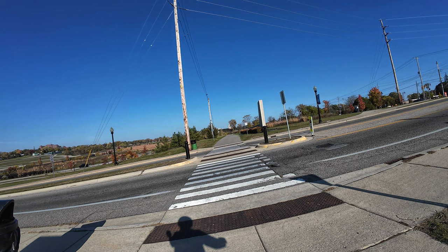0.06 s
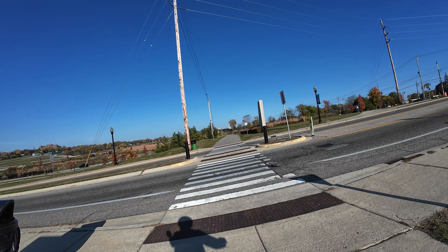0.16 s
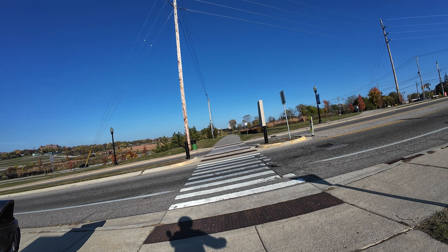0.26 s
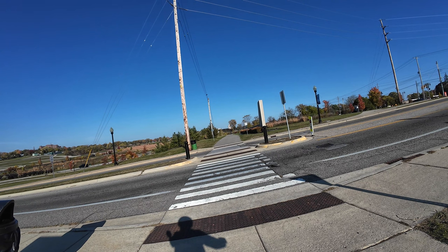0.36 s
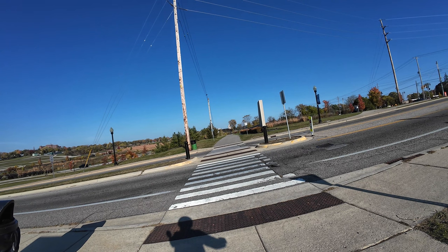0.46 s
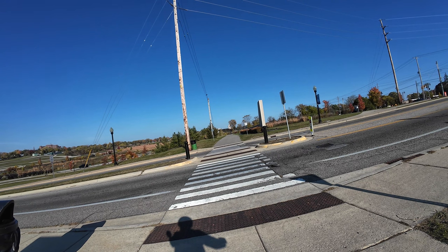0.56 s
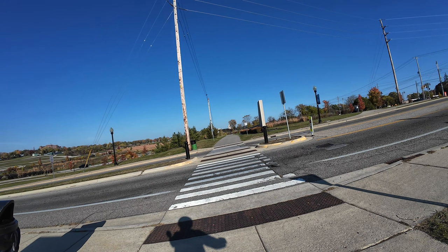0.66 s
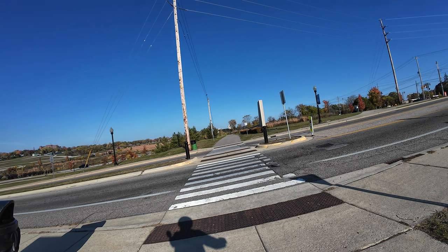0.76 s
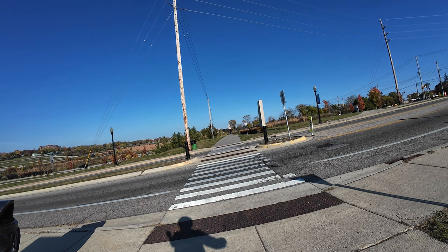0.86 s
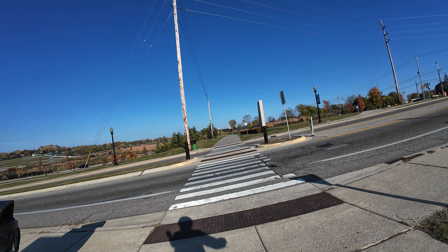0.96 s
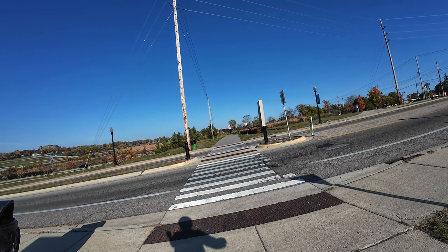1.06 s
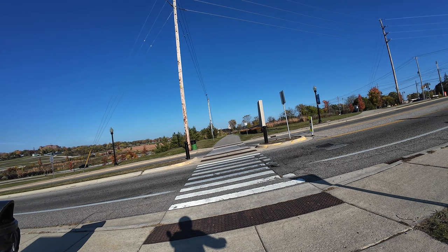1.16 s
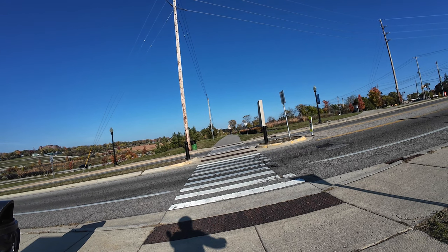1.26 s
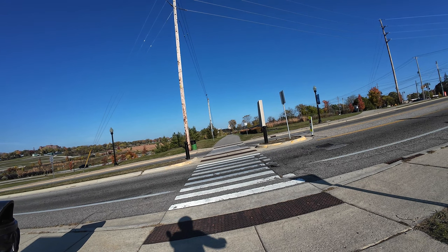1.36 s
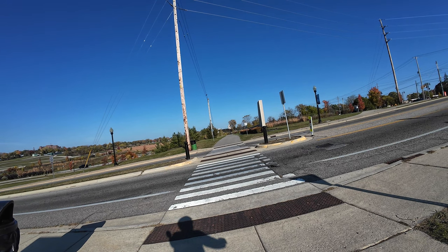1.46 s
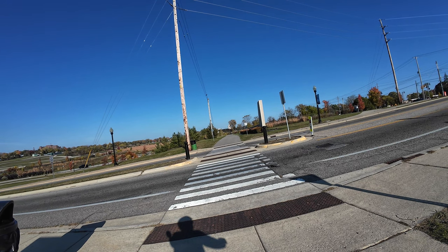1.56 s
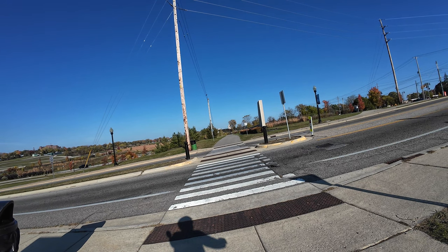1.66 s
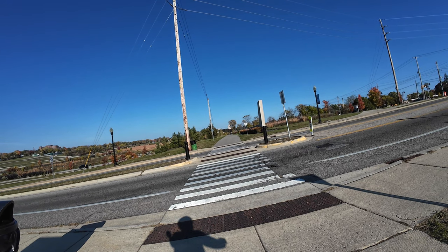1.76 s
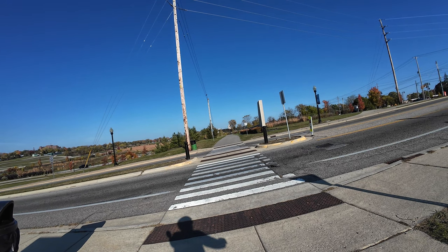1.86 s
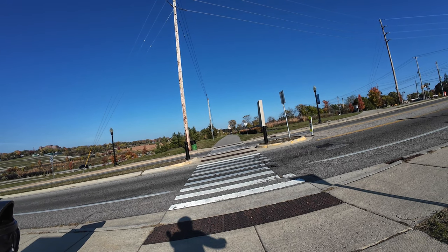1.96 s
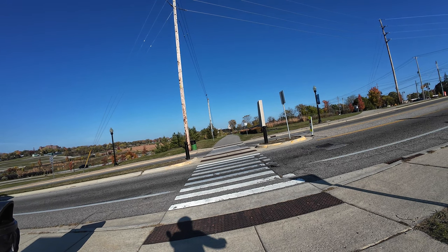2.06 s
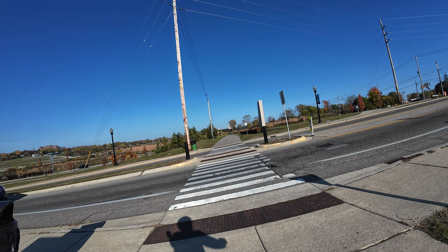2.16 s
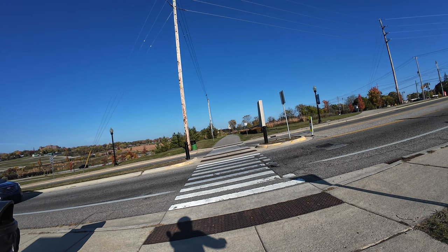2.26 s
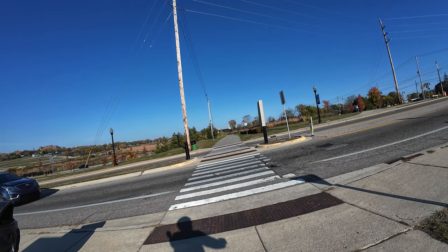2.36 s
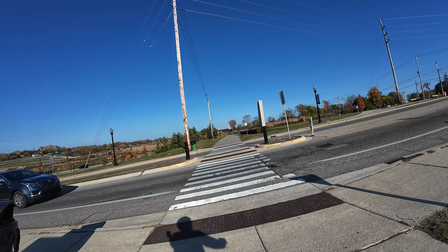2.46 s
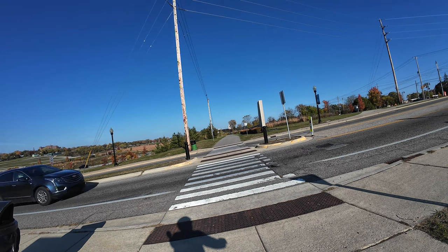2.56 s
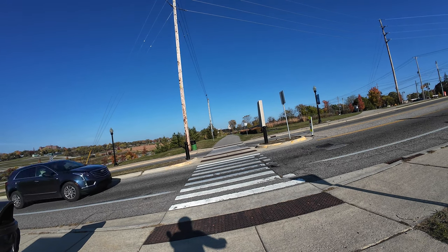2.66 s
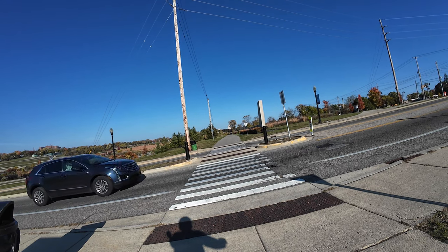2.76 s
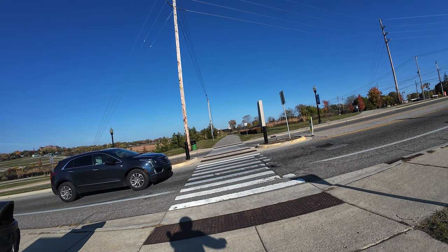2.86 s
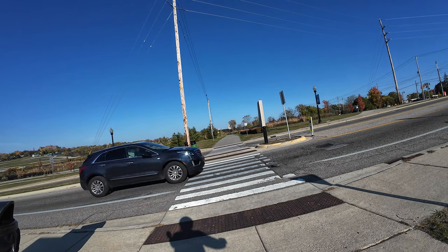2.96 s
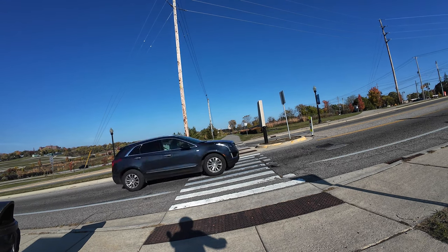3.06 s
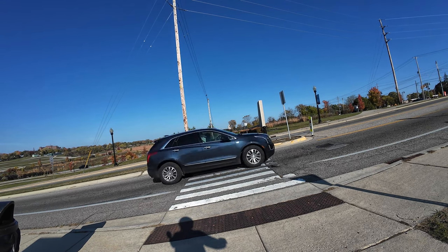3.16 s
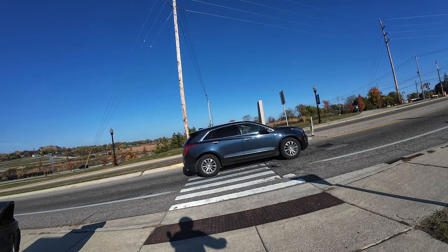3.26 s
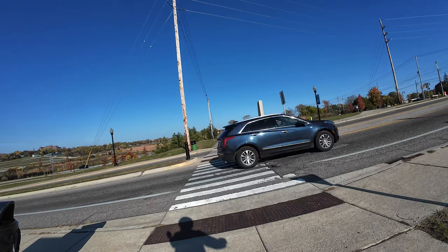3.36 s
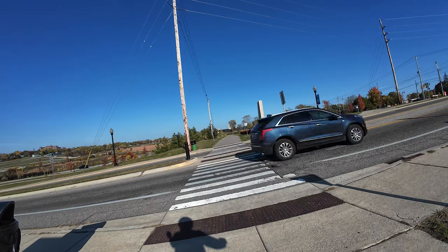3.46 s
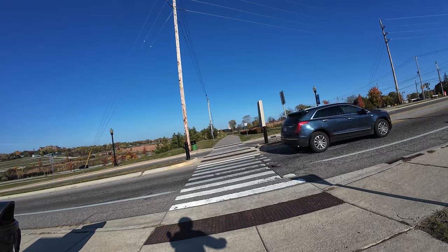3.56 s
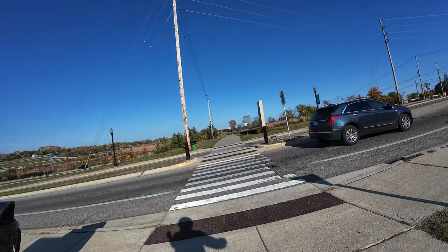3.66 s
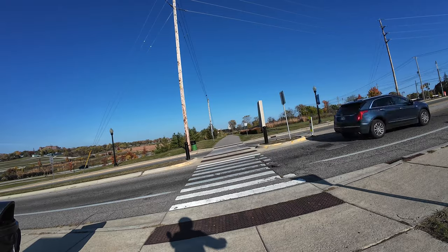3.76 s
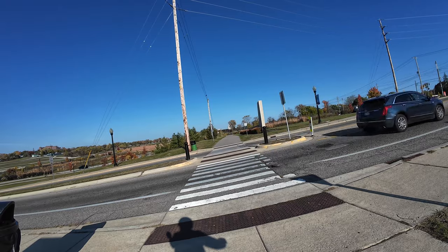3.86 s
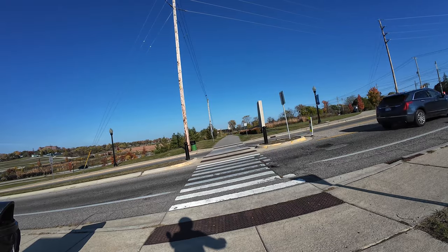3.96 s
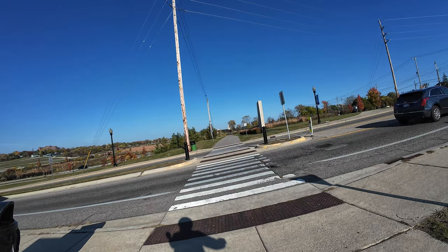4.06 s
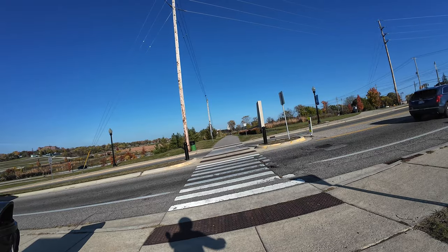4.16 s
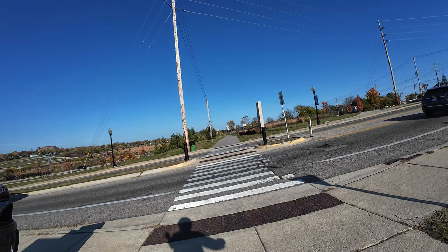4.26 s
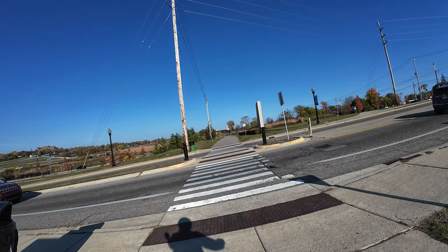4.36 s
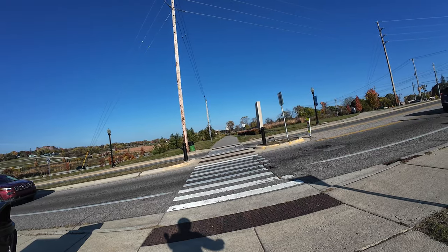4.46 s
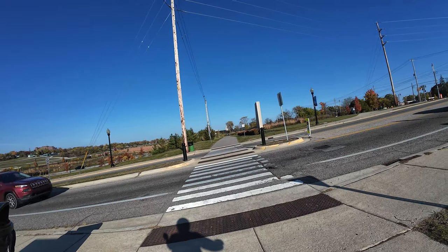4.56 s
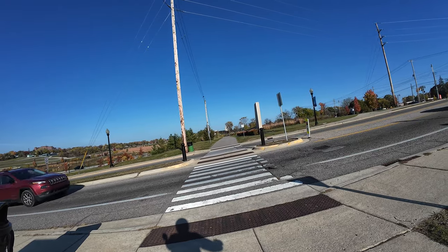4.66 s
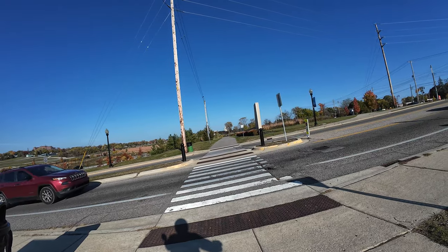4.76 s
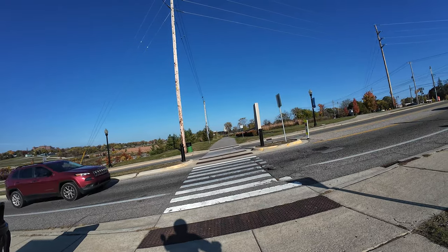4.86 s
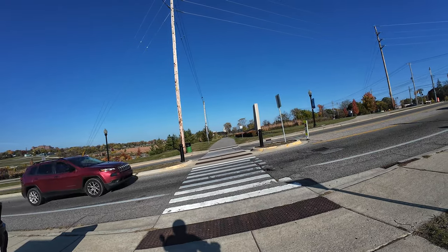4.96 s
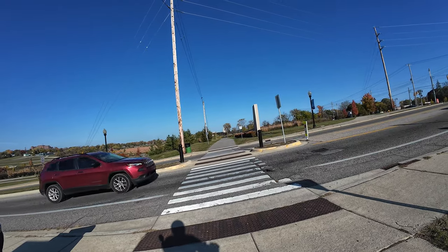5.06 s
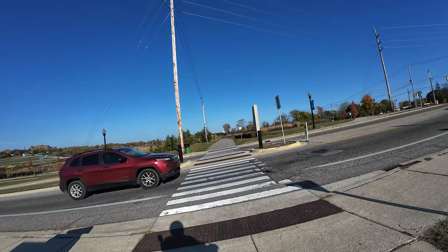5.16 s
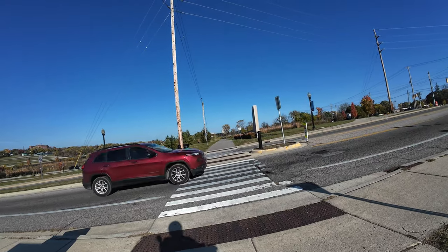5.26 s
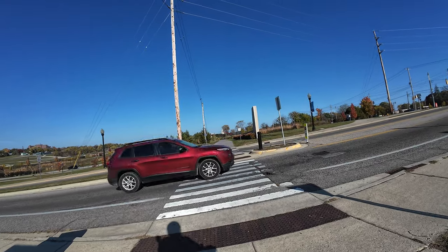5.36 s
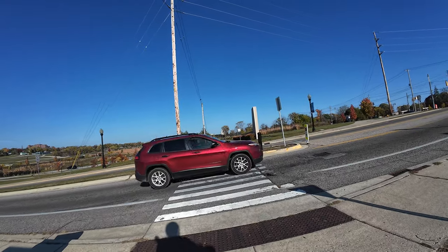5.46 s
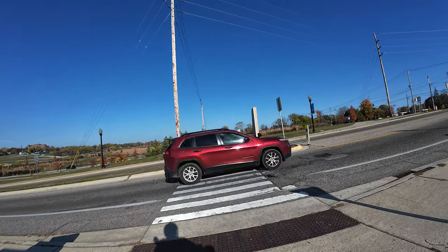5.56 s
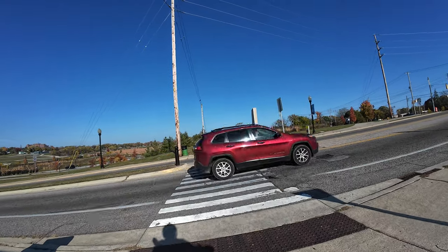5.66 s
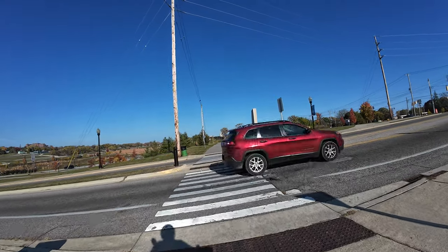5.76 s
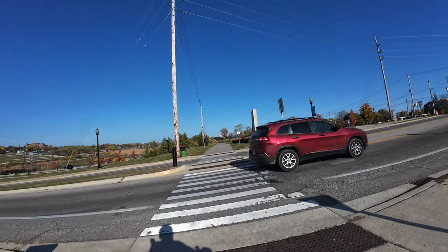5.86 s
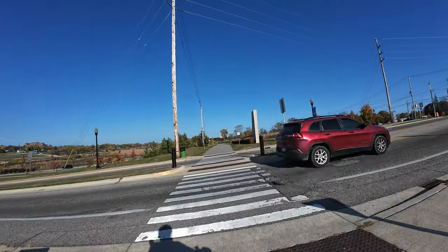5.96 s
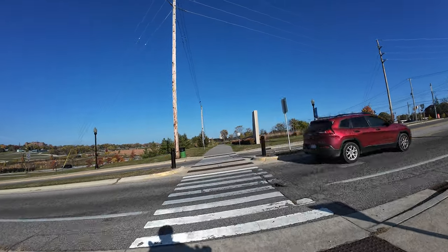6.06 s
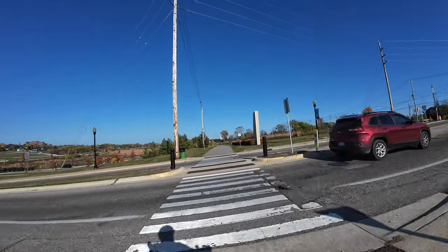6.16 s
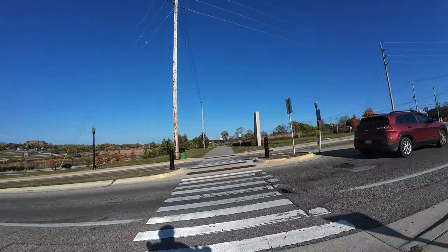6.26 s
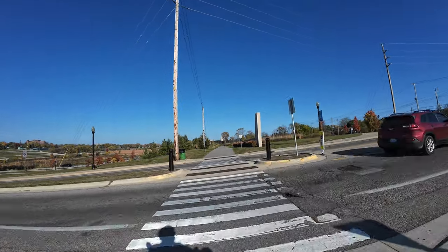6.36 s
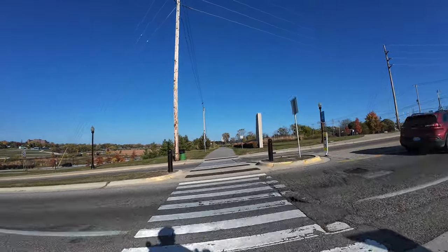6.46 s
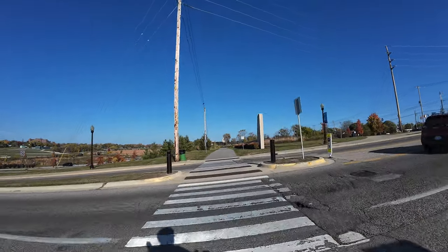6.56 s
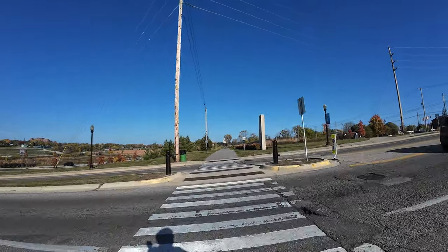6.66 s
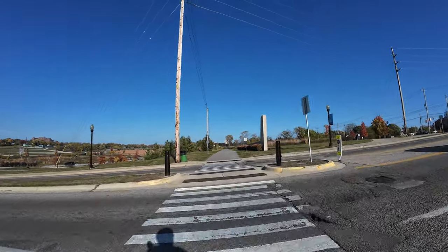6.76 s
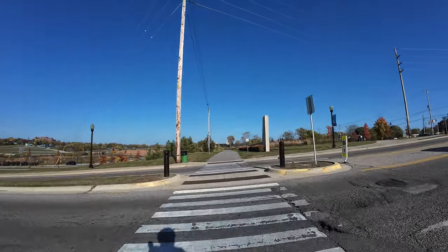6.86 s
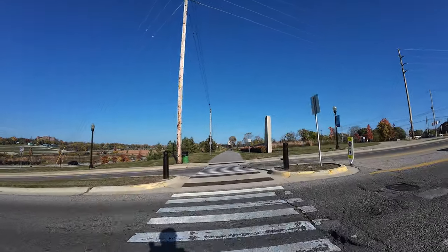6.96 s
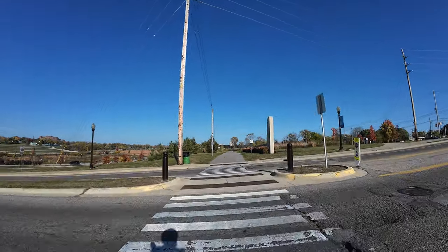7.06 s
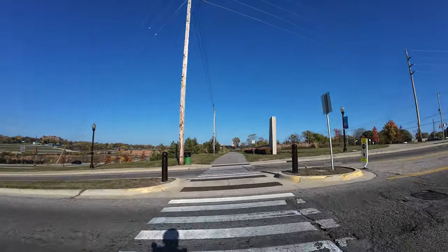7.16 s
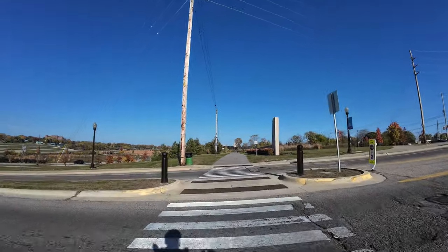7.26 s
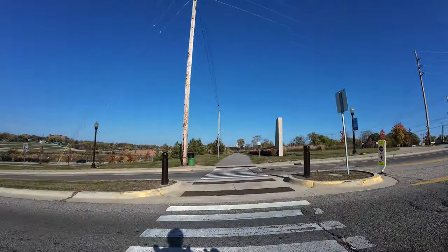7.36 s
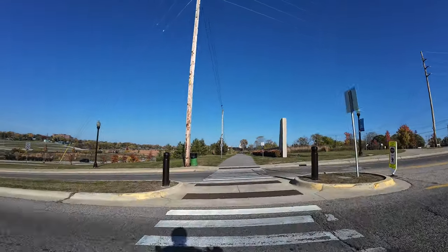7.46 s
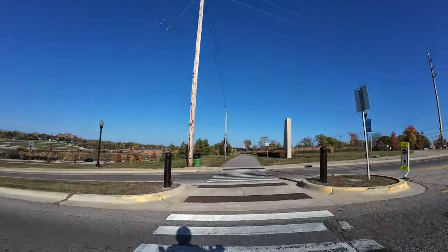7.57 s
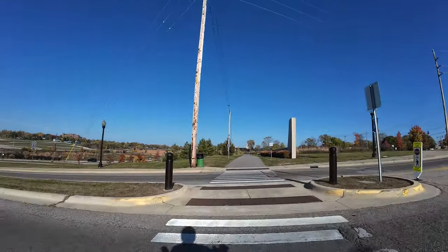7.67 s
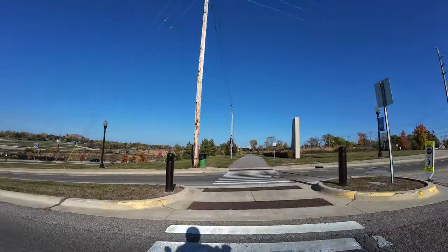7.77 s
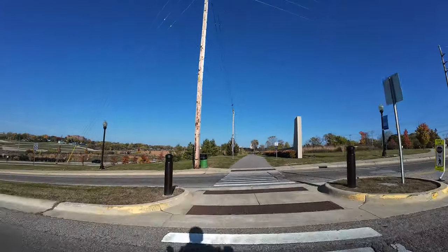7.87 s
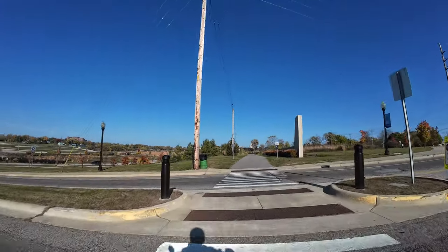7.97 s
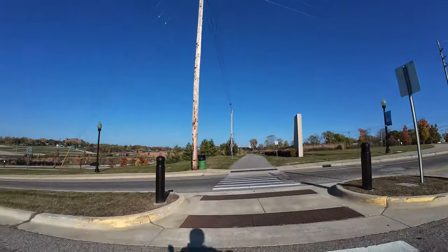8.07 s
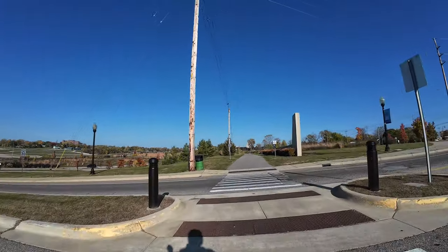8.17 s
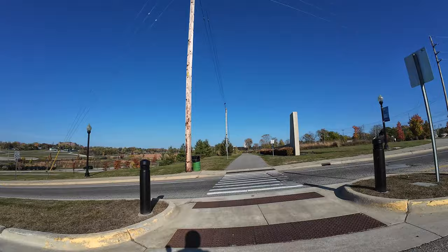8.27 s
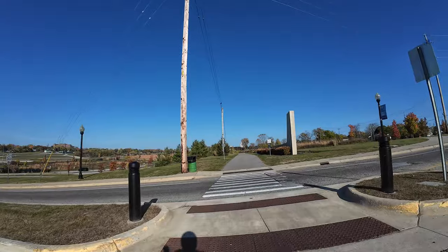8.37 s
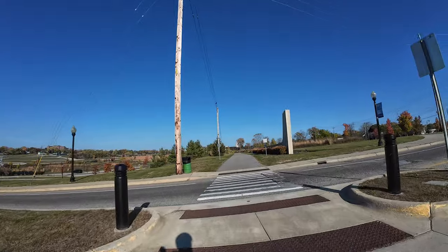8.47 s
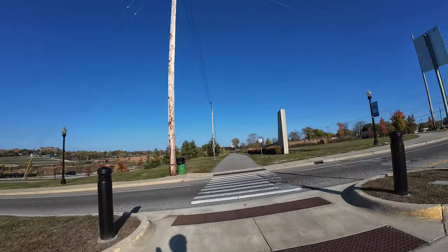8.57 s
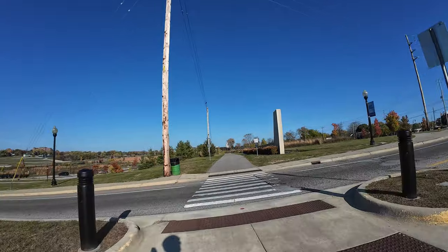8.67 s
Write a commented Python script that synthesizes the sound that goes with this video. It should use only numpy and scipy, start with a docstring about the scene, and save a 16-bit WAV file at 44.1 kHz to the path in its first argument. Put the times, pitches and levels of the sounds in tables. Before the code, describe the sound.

Two cars sweep past left to right with tyre roar and wheel thuds, gusts rumbling on the microphone, then a bike rolls off with throbs and clicks.

```python
"""Cars on a road beside a path, on two close microphone ports: one passes as it begins, two follow left to right,
one nears from the right. Banded noise makes tyres and bodies; sines the engines; decaying rings the wheel thuds.
The bike that carries the microphone rolls off: its frame throbs, its drive whines (sines) and clicks (noise).
Gusts rumble on the ports as low noise, and an insect trills in the verge with short pips of sine and noise."""
import sys
import numpy as np
from scipy import signal
from scipy.io import wavfile
from scipy.ndimage import uniform_filter1d, map_coordinates

SR = 44100
rng = np.random.default_rng(int(sys.argv[2]) if len(sys.argv) > 2 else 0)


def to_wav(s):
    """Save 16-bit WAV."""
    ch = np.atleast_2d(s).T  # columns
    pcm = np.round(np.clip(ch, -1, 1) * 32767)  # PCM
    wavfile.write(sys.argv[1], SR, pcm.astype(np.int16))


N = 384111


def amp(db):
    """Gain of a level in dB."""
    return 10 ** (np.asarray(db) / 20)


def rms_one(x):
    """Scaled to rms 1."""
    return x / np.sqrt(np.mean(x ** 2) + 1e-20)


def in_time(rows):
    """Columns of a table, sample by sample; its first column is time in seconds."""
    s, *columns = np.transpose(rows)
    return [np.interp(np.arange(N) / SR, s, c) for c in columns]


def every_sample(coarse):
    """A control kept at every 256th sample, filled in."""
    return np.interp(np.arange(N) / 256, np.arange(len(coarse)), coarse)


def sounding(rows, fade_s=0.013):
    """1 while a table lasts, fading at both ends."""
    t = np.arange(N) / SR
    inside = np.minimum(t - rows[0][0], rows[-1][0] - t)
    return np.clip(inside / fade_s + 1, 0, 1)


def at_hz(points, hz, outside=None):
    """A spectrum read on a log-frequency axis."""
    point_hz, value = np.transpose(points)
    return np.interp(np.log(hz), np.log(point_hz + 1e-9), value, outside, outside)


def drift(rate_hz):
    """Slow chance: coarse noise through a double one-pole low-pass, spread 1."""
    r = np.exp(-80 * np.pi * rate_hz / SR)      # one value per 40 samples
    noise = rng.standard_normal(N // 40 + 2002)
    slow = signal.lfilter([1], [1, -2 * r, r * r], noise)[2000:]      # settled part only
    return np.interp(np.arange(N) / 40, np.arange(len(slow)), rms_one(slow))


def band(x, low_hz, high_hz, order=2):
    """Butterworth band-pass."""
    edges = [low_hz, min(high_hz, .45 * SR)]
    return signal.sosfilt(signal.butter(order, edges, "band", fs=SR, output="sos"), x)


def tone(hz, db):
    """A sine of moving pitch and rms level."""
    cycles = np.cumsum(hz) / SR + rng.random()
    return np.sqrt(2) * amp(db) * np.sin(2 * np.pi * cycles)


def swells(times, levels_db, lengths):
    """Bell-shaped swells of power, summed; each length is the half length to 1/e."""
    t = np.arange(0, N, 64) / SR
    power = sum(amp(2 * db) * np.exp(-((t - s) / length) ** 2) for s, db, length in zip(times, levels_db, lengths))
    return np.interp(np.arange(N) / SR, t, power)


ROLL_START_S, ROLL_FULL_S = 5.3, 6.5


def rolling(t):
    """Speed of the bike, 0-1, gathered evenly."""
    return np.clip((t - ROLL_START_S) / (ROLL_FULL_S - ROLL_START_S), 0, 1)


# Spectra of body boom, tyre hiss and grit spray. Each row: frequency in Hz, relative level in dB per Hz.
BOOM, HISS, SPRAY = [(70, -18), (95, -3.5), (125, -3), (170, -3), (250, -2), (350, -3), (500, -4.5),
                     (700, -13.5), (1000, -31)], [(1500, -25), (2300, -4.5), (3300, -3), (4500, -4.5), (6200, -8.5),
                                   (7000, -17), (8500, -11.5)], [(6000, -25), (7200, -5), (8200, -2.5), (10000, -3),
                                                 (11800, -6), (13200, -3), (14500, -3.5), (16000, -20)]
# Spectra of tyre roar and tread song. Each row: multiple of the centre, relative level in dB per Hz.
ROAR, SONG = [(.4, -18.5), (.6, -10.5), (.8, -5), (.9, -1), (1, -0.5), (1.1, -1), (1.25, -6), (1.5, -8.5),
              (2.1, -31)], [(.6, -28), (.8, -6), (1, 2.5), (1.2, -3), (1.5, -11), (2.1, -24)]
# Colour of the traffic as the cars come and go. Each row: time in seconds, roar centre in Hz, song centre in Hz,
# boom slope and hiss slope in dB per octave.
COLOUR = [(0.0, 860, 1420, 1.5, -17), (0.19, 800, 1400, 1.5, -18), (0.27, 990, 1450, -1.5, -19),
          (0.5, 900, 1450, -.8, -21), (1.15, 830, 1450, -1.2, -18.5), (1.67, 810, 1470, -1.5, -12.5),
          (2.3, 810, 1410, -1.6, -16.5), (2.8, 800, 1500, -1.2, -13.5), (3.5, 727, 1500, -1.3, -9),
          (3.95, 813, 1440, -0.94, -10), (4.6, 880, 1490, -.2, -13), (5.12, 940, 1530, -0.5, -13),
          (5.7, 840, 1470, -2.1, -10), (6.62, 880, 1394, -.8, -7.5), (7.05, 720, 1400, -1.4, -7.5),
          (7.4, 765, 1400, -2.9, -8.5), (8.01, 870, 1380, -3, -10.5), (8.71, 830, 1470, -2.2, -8)]
BOOM_PIVOT_HZ, HISS_PIVOT_HZ = 220, 3300
# Notch cut in the boom by the echo off the ground. Each row: time in seconds, centre in Hz, depth in dB.
GROUND_NOTCH = [(0, 363, 10), (1.2, 346, 8.5), (2, 298, 4), (2.8, 277, 2), (3.5, 298, 5.5), (4.2, 321, 8),
                (5, 406, 2.5), (6, 450, -1), (7, 370, 6.5), (7.8, 395, 5), (8.71, 410, 7.5)]
NOTCH_OCTAVES = 0.33      # half width to 1/e of the depth
# Likeness of the ports before scattering. Each row: frequency in Hz, left-right likeness (0-1).
LIKENESS = [(60, 1), (250, .9998), (450, .999), (800, 0.99), (1500, 0.97), (3000, 0.97), (5000, 0.72),
            (9000, 0.75), (14000, 0.77)]
# Balance of the ports. Each row: frequency in Hz, left minus right in dB.
TILT = [(250, 0), (700, .5), (1500, .7), (3000, 1), (5500, 1.5), (10000, -1.2), (14000, -.5)]


def traffic(patchy_db=1.0, shared_db=-0.66):
    """Five noise sources add their power in narrow bands, each band with its own flicker and likeness."""
    edges = 80 * 2 ** (np.arange(39) / 5)      # fifths of an octave
    hz = np.sqrt(edges[1:] * edges[:-1])[:, None]
    roar_hz, song_hz, boom_slope, hiss_slope = np.array(in_time(COLOUR))[:, ::256]
    notch_hz, notch_db = np.array(in_time(GROUND_NOTCH))[:, ::256]
    notch = -notch_db * np.exp(-(np.log2(hz / notch_hz) / NOTCH_OCTAVES) ** 2)
    layers, _, scattered_db = passes()
    scattered = amp(every_sample(scattered_db))
    boom = at_hz(BOOM, hz, -99) + boom_slope * np.log2(hz / BOOM_PIVOT_HZ) + notch
    roar = at_hz(ROAR, hz / roar_hz, -99)
    song = at_hz(SONG, hz / song_hz, -99)
    hiss = at_hz(HISS, hz, -99) + hiss_slope * np.log2(hz / HISS_PIVOT_HZ)
    spray = at_hz(SPRAY, hz, -99)
    power = 0
    for shape, layer in zip((boom, roar, song, hiss, spray), layers):
        share = amp(2 * shape) * hz      # a band's width grows with its frequency
        power = power + share / share.sum(axis=0) * layer
    white = rng.standard_normal((2, 2, N))      # neighbouring bands take different noise
    together, out = drift(1.0), 0
    for k, (low, high) in enumerate(zip(edges, edges[1:])):
        pair = band(white[k % 2], low, high, order=3)
        mid, side = pair / pair.std()
        alike = np.clip(at_hz(LIKENESS, hz[k]), 0, 1)
        width = np.sqrt((1 - alike) / (1 + alike)) * scattered
        flicker = amp(patchy_db * drift(4.8) + shared_db * together)
        gain = every_sample(np.sqrt(power[k])) * flicker
        balance = amp(at_hz(TILT, hz[k]) / 2 * np.array([[1], [-1]]))
        out = out + gain * balance * (mid + width * side * [[1], [-1]])
    return out


# The cars. Each row: time abreast in seconds, seconds to cover its passing distance coming, the same leaving,
# heading (+1 right, -1 left), then level in dB, before the dip abreast, of boom, roar, song, hiss and spray.
CARS = [(.04, .3, .2, 1, -43.5, -35, -40.5, -60, -90), (3.32, .89, .7, 1, -33, -27, -28, -40.3, -48.5),
        (5.71, .9, .92, 1, -27.5, -31, -29, -41.5, -46), (9.0, .5, 1.2, -1, -51, -40, -32.5, -61, -89)]
# The same five layers over distance. Each row: dB lost per tenfold distance, further dB lost per passing distance,
# seconds late, dip in dB when abreast, far road in dB, rolling bike in dB at full speed.
LAYERS = [(11.3, 8, .3, 3, -43, -38), (10, 6.4, .09, .6, -46, -39.5), (10, 8, -.27, 9.1, -48.5, -71),
          (47, .1, -.11, .1, -58, -80), (115, 8, .01, 7.5, -93, -73)]
SURGE_S = .085      # the swell in power after a joint falls to 1/e in this time
PORT_LAG_US, SCATTER_DB, SPLIT_DB = 50, -1.8, 11      # largest lag; scatter, and its rise with spread bearings


def passes():
    """Power of each layer, left port lag in samples and scatter in dB, every 256th sample, from the cars' distance."""
    t = np.arange(0, N, 256) / SR
    loss_db, air_db, late, dip_db, far_db, roll_db = np.transpose(LAYERS)[:, :, None]
    heard, side = [], []
    for s, coming, leaving, heading, *db in CARS:
        along = (t - s - late) / np.where(t < s + late, coming, leaving)
        far = 1 + along ** 2      # squared distance over squared passing distance
        lost_db = loss_db * np.log10(far) + 2 * air_db * (np.sqrt(far) - 1) + 2 * dip_db / far
        heard.append(amp(2 * np.c_[db] - lost_db))
        side.append(np.sign(heading) * along[3] / np.sqrt(far[3]))      # the hiss tells the direction
    share, side = np.array(heard)[:, 3] / sum(heard)[3], np.array(side)
    bearing = (share * side).sum(axis=0)
    split = np.sqrt(np.maximum((share * side ** 2).sum(axis=0) - bearing ** 2, 0))
    power = sum(heard) + amp(2 * far_db) + amp(2 * roll_db) * rolling(t) ** 2
    for s, *_, boom_db, roar_db in THUDS:
        surge = (t >= s) * np.exp(-np.abs(t - s) / SURGE_S)
        power[:2] += amp(2 * np.c_[[boom_db, roar_db]]) * surge
    return power, PORT_LAG_US * bearing * SR / 1e6, SCATTER_DB + SPLIT_DB * split


def arriving(pair):
    """The whole road reaches the port nearer to the cars' mean bearing first."""
    half = every_sample(passes()[1]) / 2
    return np.array([map_coordinates(ear, [np.arange(N) + sign * half], order=3, mode="nearest")
                     for ear, sign in zip(pair, (-1, 1))])


# Engines, one table each. Each row: time in seconds, firing rate in Hz, mean level in dB of each order heard.
ENGINES = [
    [(2.92, 56.5, -45), (2.97, 56.7, -32), (3.1, 55.3, -36), (3.58, 53.8, -35), (3.7, 54.7, -45)],
    [(5.25, 55.2, -31, -40, -39, -41, -46), (5.412, 56.5, -29, -55, -33, -46, -44),
     (5.492, 58.1, -27, -44, -30, -33, -54), (5.548, 58.2, -26, -57, -28, -42, -39),
     (5.702, 58.97, -30, -25, -32.5, -41, -33), (5.9, 56, -30.5, -27.5, -35, -42, -39),
     (5.97, 54.8, -31, -38, -33, -42, -41), (6.05, 53.8, -31, -35, -35.5, -42, -42),
     (6.19, 53.7, -33, -36, -37, -39, -52), (6.31, 52.6, -33, -45, -33, -43, -48),
     (6.55, 50.5, -37, -49, -41, -50, -55), (7.0, 50, -40, -52, -45, -55, -60),
     (7.8, 50.6, -42, -55, -43, -58, -62), (8.71, 52.6, -43, -55, -43, -60, -62)],
]


def engines():
    """Low orders of each firing rate, slightly unsteady in level."""
    out = 0
    for rows in ENGINES:
        hz, *levels = in_time(rows)
        for order, db in zip((1, 2, 3, 5, 6), levels):
            out = out + sounding(rows) * tone(order * hz, db + 1.2 * drift(12.0))
    return out


# Wheels over joints. Each row: time in seconds, ring level in dB before onset and band-pass, ring in Hz,
# seconds to fall 60 dB, slap level in dB before the band-pass, boom surge in dB, roar surge in dB.
THUDS = [(.13, -26, 650, .05, -36, -42, -38), (3.170, -9.5, 830, 0.024, -20, -40, -36),
         (3.315, -17, 320, .025, -24, -25, -40), (3.321, -13, 800, .016, -14, -40, -27),
         (3.346, -14, 640, .014, -24, -40, -40), (3.532, -4, 412, 0.017, -10.5, -30, -31),
         (3.358, -15, 700, .015, -20, -45, -45), (3.5565, -8, 700, 0.03, -25, -34, -40),
         (5.641, -9, 360, 0.039, -14, -27, -31), (5.966, -13, 841, 0.034, -18, -33, -35)]


def thuds():
    """A slap and a short ring of the tyre cavity; rubber meets the road softly."""
    out, t = np.zeros(N), np.arange(6000) / SR
    slap = np.sin(2 * np.pi * 1250 * t) * amp(-60 * t / 0.006)
    for s, db, hz, t60, slap_db, *_ in THUDS:
        onset = 1 - np.exp(-t / .001)
        ring = np.sin(2 * np.pi * hz * t) * amp(-60 * t / t60) * onset
        out[round(s * SR):][:len(t)] -= amp(db) * ring - amp(slap_db) * slap
    return band(out, 146, 2800)


# Grit thrown up by the near wheels. Each row: start in seconds, relative level in dB, length in seconds to 1/e.
GRIT = [(3.371, -44, 0.02), (3.541, -42, 0.02), (3.6294, -45, 0.02), (5.6545, -42, 0.02),
        (5.915, -39, 0.024), (5.948, -37, 0.029), (6.1315, -44, 0.015)]


def grit():
    """Soft-edged bursts of bright noise."""
    t, bursts = np.arange(N) / SR, 0
    for s, db, length in GRIT:
        bursts = bursts + amp(db - 2) * np.exp(-((t - s - length / 2) / length) ** 2 * 4)
    mid, side = band(rng.standard_normal((2, N)), 7300, 16000)
    return bursts * (mid + 0.26 * side * [[1], [-1]])


# Throbs of the frame, at the microphone. Each row: time in seconds, mean pitch in Hz, mean level in dB,
# half length in seconds to 1/e, level in dB of the headwind buffet that comes with it.
THROBS = [(5.165, 29.2, -21, .03, -50), (5.31, 28.9, -29, .035, -50), (5.54, 32.5, -29, .04, -50),
          (5.64, 33, -28, .035, -50), (5.75, 33.4, -36, .04, -50), (5.93, 32, -21, .065, -50),
          (6.15, 31.7, -29, .03, -50), (6.265, 31.6, -21, .045, -50), (6.51, 31.5, -20, .03, -33),
          (6.67, 32.4, -18, .09, -34), (6.905, 31.6, -15.5, .065, -31), (7.04, 31.2, -22, .05, -32),
          (7.235, 31.8, -16, .045, -30), (7.48, 31.7, -21, .05, -32), (7.68, 34.8, -18, .045, -33),
          (7.78, 34, -22, .07, -36), (8.05, 34.5, -21, .05, -36), (8.17, 34.4, -20, .05, -35),
          (8.37, 33, -17, .05, -39), (8.6, 32.8, -21, .06, -36), (8.71, 32.5, -24, .02, -33)]
THROB_WAVER = .055      # spread of pitch, as a share


def throb():
    """The frame swells and fades on a low, wavering note."""
    s, hz, db, length, _ = np.transpose(THROBS)
    pitch = np.interp(np.arange(N) / SR, s, hz) * (1 + THROB_WAVER * drift(39.8))
    return np.sqrt(swells(s, db, length)) * tone(pitch, 2.2 * drift(30.0))


# Push-off groan, drive whine and tyre hum, one table each. Each row: time in seconds, mean Hz, mean level in dB.
BIKE_TONES = [
    [(5.06, 116, -36), (5.1, 110, -27), (5.14, 98, -26.5), (5.17, 78, -25), (5.2, 58, -34)],
    [(5.95, 245, -44), (6.02, 255, -38), (6.11, 266, -35), (6.17, 288, -34), (6.22, 299, -31),
     (6.3, 316, -30), (6.35, 315, -33), (6.45, 335, -33), (6.566, 383, -34), (6.61, 388, -37),
     (6.65, 390, -47)],
    [(6.9, 180, -38), (7.1, 170, -42), (7.2, 184, -40), (7.3, 185, -33), (7.5, 190, -42), (7.6, 187, -41),
     (7.78, 190, -34), (7.95, 192, -36), (8.1, 180, -39), (8.25, 170, -37), (8.45, 186, -42),
     (8.71, 194, -36)],
]
# Spread of pitch of each of these tones, as a share.
TONE_WAVER = [.01, 0.005, 0.028]


def bike_tones():
    """Groan, whine and hum, each a sine wavering in pitch and, by the same measure, in level."""
    out = 0
    for rows, waver in zip(BIKE_TONES, TONE_WAVER):
        hz, db = in_time(rows)
        pitch = hz * (1 + waver * drift(39.8))
        out = out + sounding(rows) * tone(pitch, db + 60 * waver * drift(30.0))
    return out


# Resonances of the rolling bike. Each row: low edge in Hz, high edge in Hz, level in dB at full speed.
RUMBLE = [(94, 116, -45), (144, 160, -47), (172, 204, -38), (245, 262, -46)]


def bike_rumble():
    """Rough asphalt, as noise, shakes the frame's resonances harder with speed."""
    asphalt = rng.standard_normal(N)
    rumble = sum(amp(db) * rms_one(band(asphalt, low_hz, high_hz)) for low_hz, high_hz, db in RUMBLE)
    return rolling(np.arange(N) / SR) * rumble


# Clicks of the bike's drive. Each row: start in seconds, peak in dB before panning, centre in Hz, width in octaves,
# seconds to fall 60 dB, left minus right in dB.
CLICKS = [(6.4572, -21, 2350, 0.5, .011, 1), (6.4590, -22.5, 4100, .8, .017, 2),
          (6.4590, -35, 7200, .9, .024, 2), (6.4600, -51, 13000, .6, .022, 0),
          (6.5480, -53, 14000, .45, .018, 0), (6.5440, -33.5, 8800, 1.15, .016, -1),
          (6.544, -21, 2000, 1.6, 0.013, 1), (7.4430, -39, 2950, 0.8, 0.07, 2),
          (7.4440, -49, 4700, .7, .04, 2), (7.6350, -62, 9000, 1.2, .015, 0),
          (7.7040, -56, 6500, .6, .015, 2), (8.0000, -51, 4750, 0.61, .03, 0),
          (8.1250, -59, 8000, 0.57, 0.016, 0), (8.3077, -30, 8700, .65, 0.0035, 0),
          (8.3077, -43, 13500, .55, .004, 0), (8.3110, -55, 9300, .65, .05, 0),
          (8.3290, -57, 9500, .7, .02, 0), (8.568, -48, 4800, .6, 0.023, 0)]


def clicks():
    """Each click is a burst of noise around its own centre that swells for a moment and dies fast."""
    out, t = np.zeros((2, N)), np.arange(5000) / SR
    noise = rng.standard_normal((len(CLICKS), 2, len(t))) * (1 - np.exp(-t / 0.00065))
    for (s, db, hz, octaves, t60, pan_db), white in zip(CLICKS, noise):
        dying = white * amp(-60 * (t / t60) ** 1.6)
        reach = 2 ** (octaves / 2)
        mid, side = band(dying, hz / reach, hz * reach, order=3)
        width = hz / 12000      # close to the ports, the treble differs more between them
        burst = (mid + width * side * [[1], [-1]]) / np.abs(mid).max()
        at = round(s * SR)
        out[:, at:at + len(t)] += amp(db + pan_db / 2 * np.array([[1], [-1]])) * burst
    return out


# Gusts at a standstill. Each row: time in seconds, slow lump in dB, faster flutter in dB, half length in seconds.
GUSTS = [(.06, -40, -38, .04), (.35, -33, -35, .04), (.48, -34, -39, .05), (.64, -55, -33, .03),
         (.765, -29, -27, .035), (.91, -36, -28, .035), (1.0, -30, -33, .03), (1.21, -34, -30, .05),
         (1.3, -40, -28.5, .04), (1.6, -32, -30, .04), (1.74, -36, -30, .03), (1.88, -44, -33, .03),
         (1.98, -36, -38, .03), (2.13, -32, -35, .03), (2.25, -39, -34, .05), (2.35, -39, -29, .03),
         (2.52, -37, -32, .04), (2.61, -32, -39, .03), (2.71, -38, -33, .03), (2.81, -43, -31, .025),
         (3.14, -36, -38, .06), (3.35, -45, -28, .05), (3.58, -33, -26, .05), (3.9, -32, -34, .05),
         (4.02, -29, -37, .05), (4.19, -38, -29, .04), (4.3, -33, -33, .05), (4.475, -26, -33, .045),
         (4.61, -26, -31, .045), (4.85, -30, -36, .07), (5.16, -42, -31, .04)]
# Breeze between gusts. Each row: time in seconds, lump level in dB, flutter level in dB.
BREEZE = [(0, -54, -42), (2, -52, -40), (5, -45, -38), (5.4, -60, -33), (5.86, -62, -28), (6.35, -64, -32),
          (6.5, -66, -50), (8.71, -66, -50)]
# Slowest wind pressure. Each row: time in seconds, level in dB, about which it drifts.
SWAY = [(0, -48), (3.6, -49), (4.1, -42), (5, -46), (5.2, -38), (6.1, -50), (6.31, -32), (7.0, -31),
        (7.3, -37), (7.9, -27), (8.2, -40), (8.71, -38)]
# Sway, lumps, flutter, headwind. Each row: low edge in Hz, high edge in Hz, evenness (0-1).
WIND_BANDS = [(10, 18, .5), (26, 46, .7), (39, 86, 0.87), (42, 64, .5)]
HEADWIND_DB = -42      # between buffets, at full speed


def wind():
    """Low noise, alike on both ports; the gusts, more than chance, set its size."""
    s, lump_db, flutter_db, length = np.transpose(GUSTS)
    calm_lump, calm_flutter = amp(2 * np.array(in_time(BREEZE)))
    throb_s, _, _, throb_length, buffet_db = np.transpose(THROBS)
    sway = amp(2 * in_time(SWAY)[0] + 6 * drift(3.0))
    lump = calm_lump + swells(s, lump_db, length)
    flutter = calm_flutter + swells(s, flutter_db, length)
    headwind = amp(2 * HEADWIND_DB) * rolling(np.arange(N) / SR) ** 2
    headwind = headwind + swells(throb_s, buffet_db, throb_length)
    out = 0
    for power, (low_hz, high_hz, even) in zip((sway, lump, flutter, headwind), WIND_BANDS):
        noise = rms_one(band(rng.standard_normal(N), low_hz, high_hz, order=3))
        size = np.sqrt(uniform_filter1d(noise ** 2, size=2600) + .02)
        out = out + np.sqrt(power) * rms_one(noise / size ** even)
    return out


# Insect in the verge. Each row: time in seconds, level in dB before panning.
TRILL = [(0, -72.5), (2.3, -66), (2.7, -78), (4, -76), (4.8, -75), (6.5, -86), (8.71, -92)]
TRILL_PER_S, TRILL_START_S = 14.8, .0547      # pips per second, middle of the first pip
TRILL_HZ, TRILL_RISE_HZ, TRILL_WOBBLE_HZ = 7750, 230, 40      # each pip bends up and down again
TRILL_SHARP, TRILL_STEADY = 4.5, .24      # power that narrows the pips, share of steady rasp


def insect():
    """Evenly spaced short pips of a high note with some rasp, over a faint steady rasp, louder on the left."""
    t = np.arange(N) / SR - TRILL_START_S + .002 * drift(4.0)
    beat = np.cos(np.pi * TRILL_PER_S * t) ** 2
    note = tone(TRILL_HZ + TRILL_RISE_HZ * beat ** 4 + TRILL_WOBBLE_HZ * drift(60.0), 0)
    rasp = rms_one(band(rng.standard_normal(N), 7600, 8120, order=4))
    pips = beat ** TRILL_SHARP * (note + .25 * rasp) + TRILL_STEADY * rasp
    return amp(in_time(TRILL)[0]) * pips * amp([[2.5], [-2.5]])


def scene():
    """The road arrives from a side; wind and bike reach both ports without lag."""
    road = traffic() + engines() + thuds() + grit() + insect()
    bike = throb() + bike_tones() + bike_rumble() + clicks()
    return arriving(road) + bike + wind()


CUTOFF_HZ = 15700      # 70 dB down from here up


def record(dry):
    """Each port adds a faint hiss of its own; the top is cut."""
    hiss = amp(-86) * band(rng.standard_normal(dry.shape), 5500, 14500)
    return signal.sosfilt(signal.cheby2(12, 70, CUTOFF_HZ, fs=SR, output="sos"), dry + hiss)


dry = scene()
out = record(dry)
to_wav(out)
```